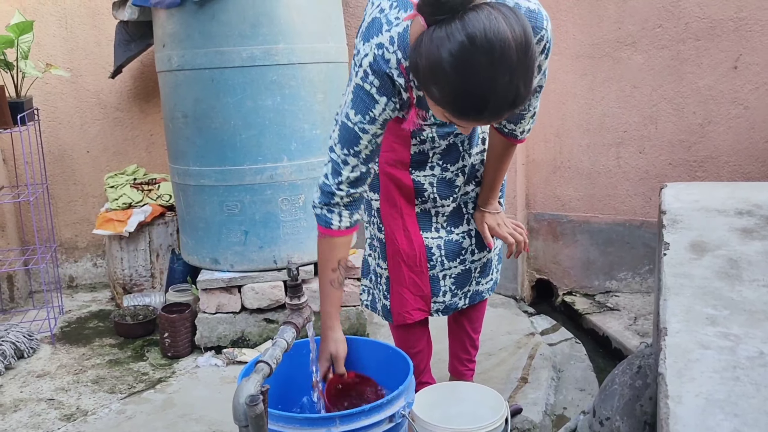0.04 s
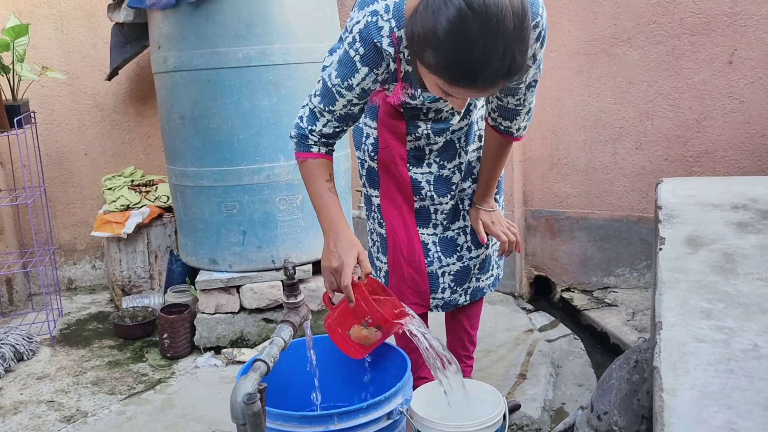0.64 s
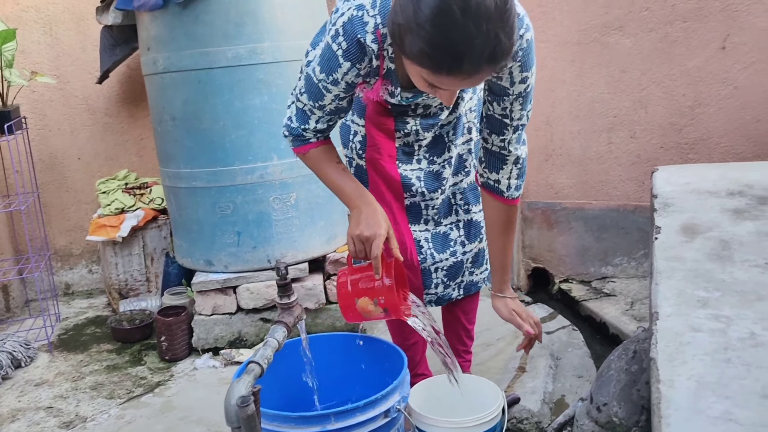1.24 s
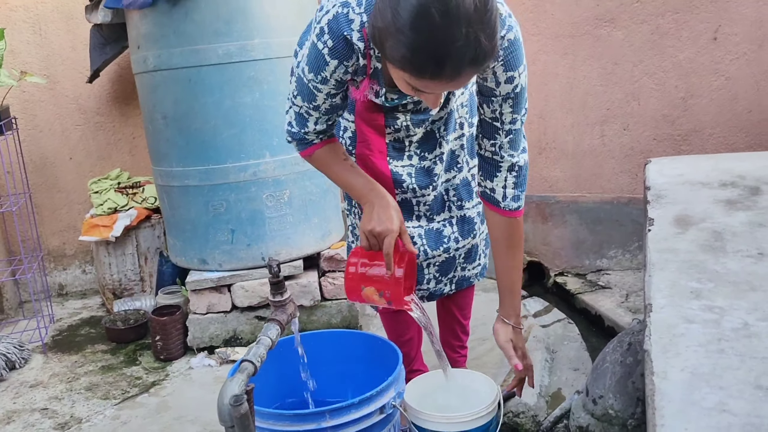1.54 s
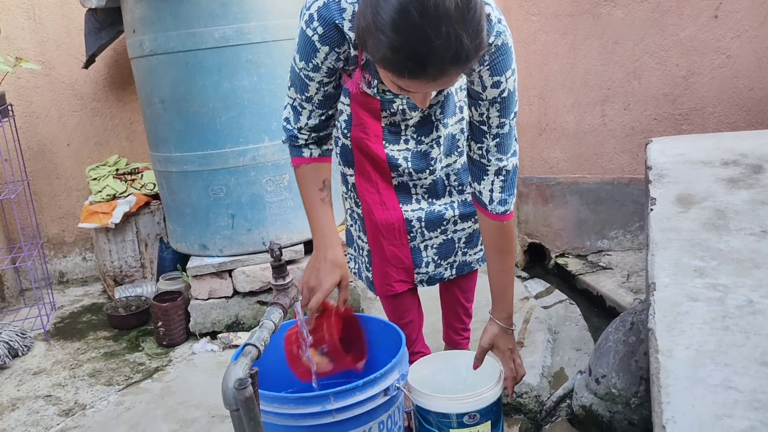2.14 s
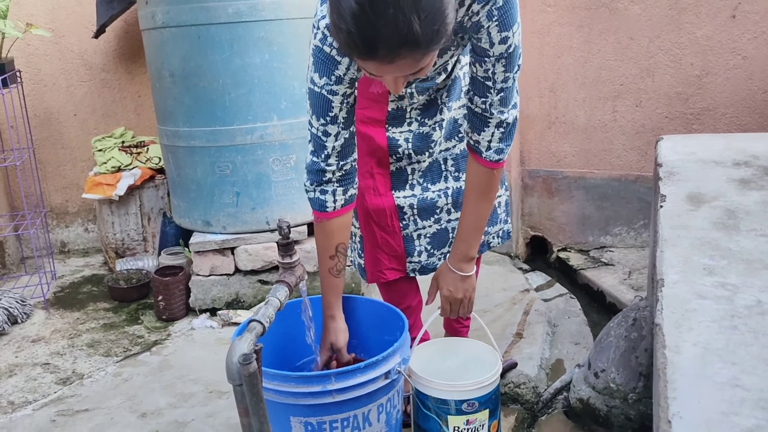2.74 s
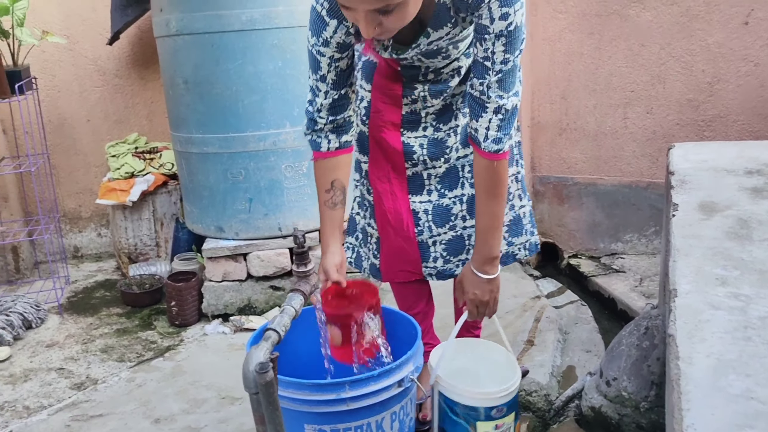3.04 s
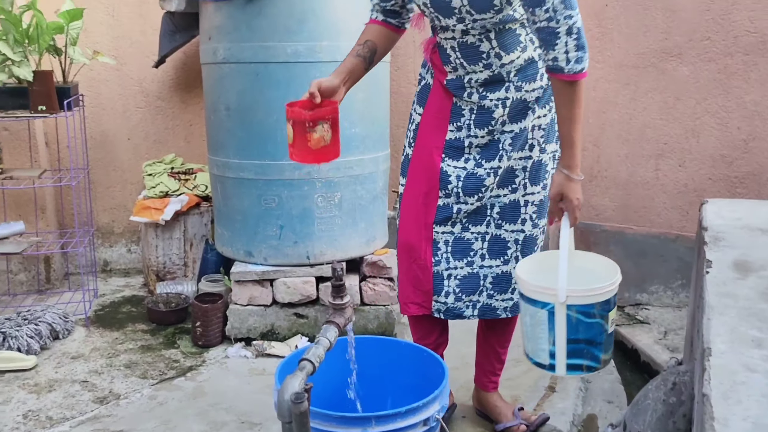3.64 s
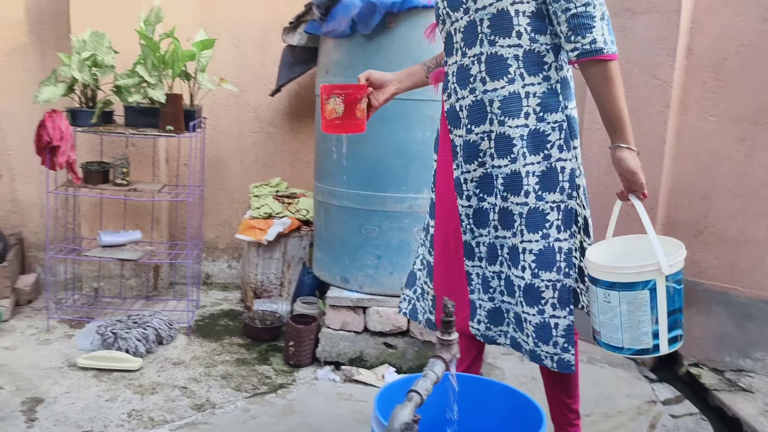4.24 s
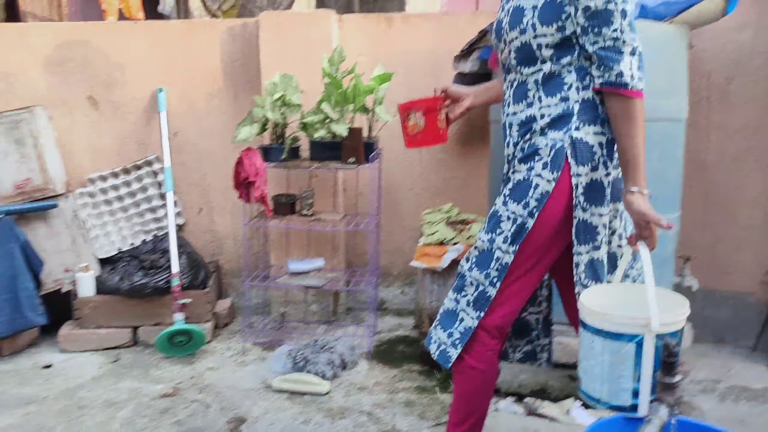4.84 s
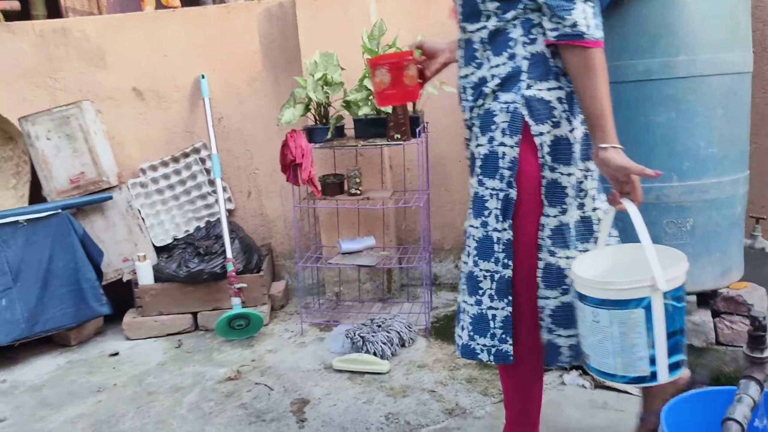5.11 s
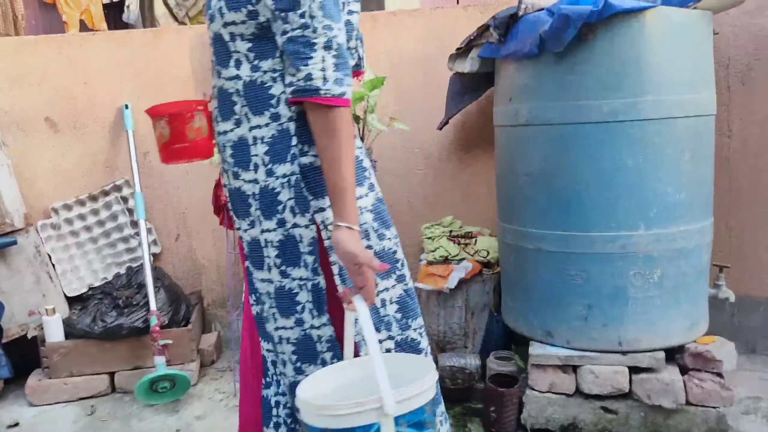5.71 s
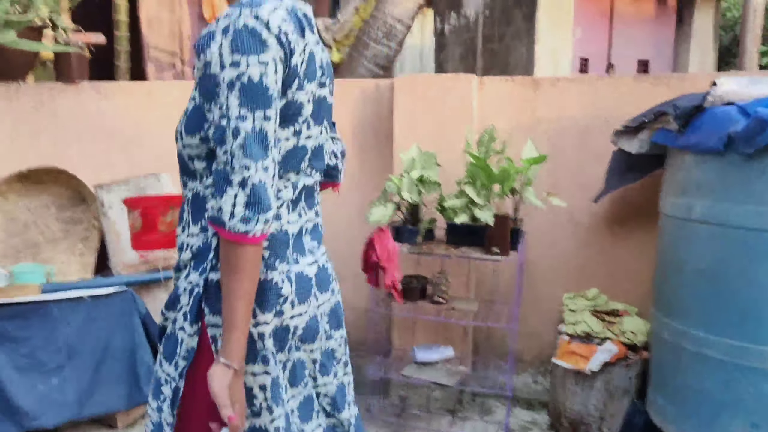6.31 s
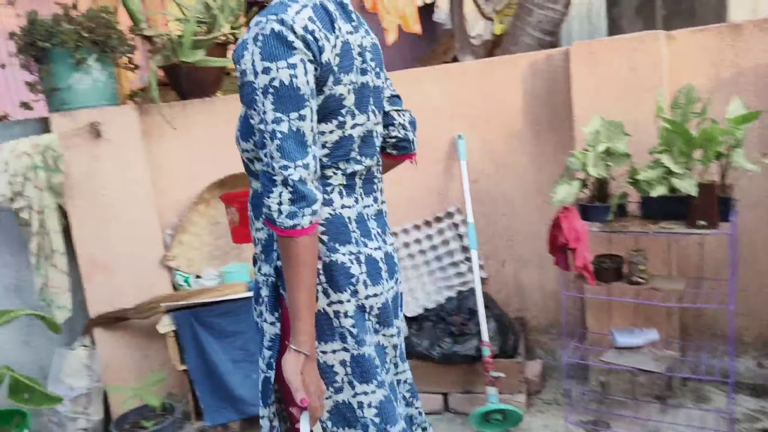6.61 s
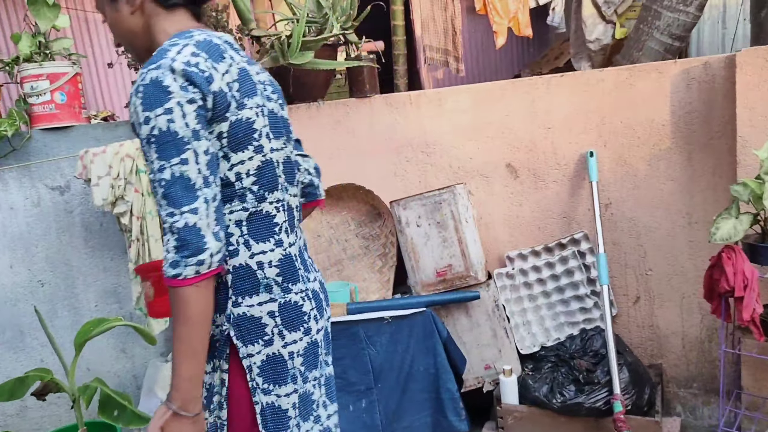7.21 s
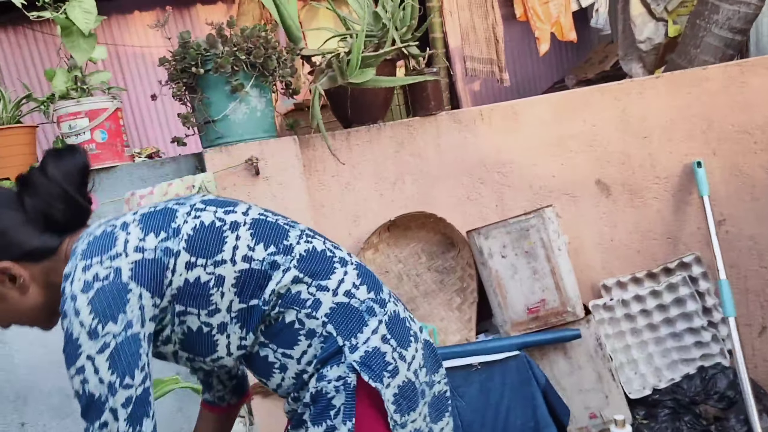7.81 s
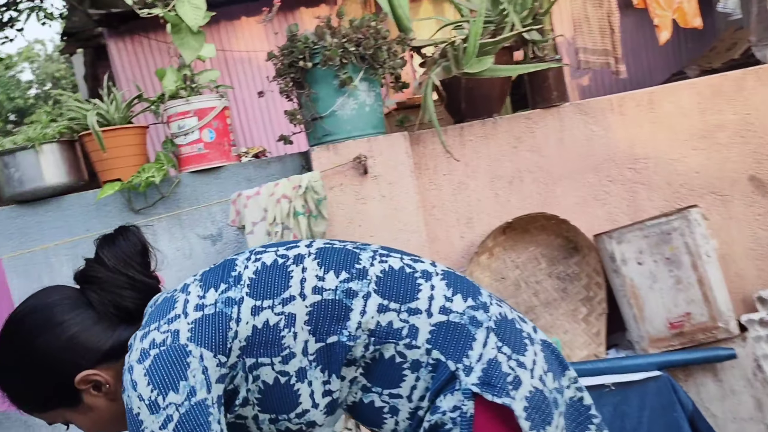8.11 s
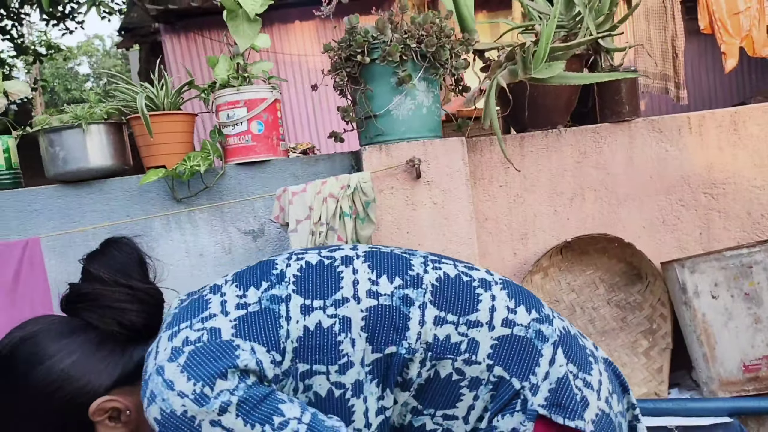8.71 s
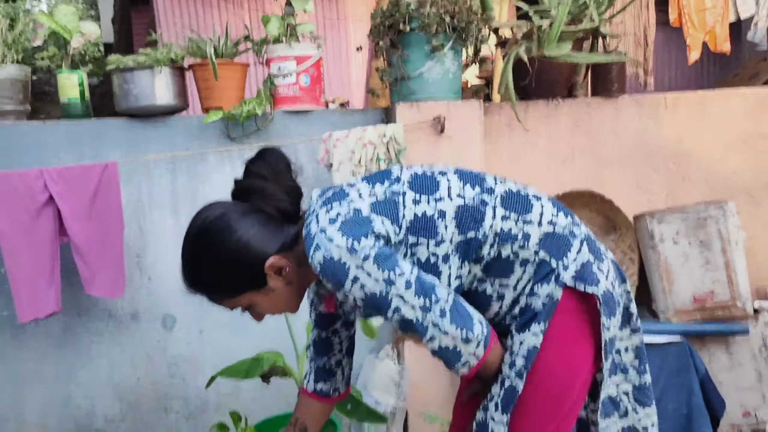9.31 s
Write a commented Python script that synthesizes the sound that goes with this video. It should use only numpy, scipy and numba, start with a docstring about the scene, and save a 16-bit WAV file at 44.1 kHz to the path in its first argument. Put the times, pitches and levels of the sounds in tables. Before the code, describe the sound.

In a walled yard, a tap runs into a half-full plastic bucket, spattering, fizzing and gurgling with deep plops. A mug scoops water and pours it into a pail with a bright burble, then clacks against the bucket and sloshes as it dips again. The microphone moves away, so the stream turns fainter, hollow and washy. Near the end a last mugful is tipped out in a brief patter of drops.

```python
"""A walled yard, where a tap runs into a half-full plastic bucket. The stream spatters, fizzes and
drives big bubbles under that gurgle in the bucket's hollow. A mug scoops water and pours it into a
pail; then the microphone moves away from the tap, which turns hollow and washy, and a last mugful
is tipped out. The water is mostly ringing bubbles and droplet clicks, echoed by the walls."""
import sys
import numpy as np
from scipy import signal
from scipy.fft import rfft, irfft
from scipy.io import wavfile
from scipy.ndimage import uniform_filter1d
from numba import njit

SR = 44100
rng = np.random.default_rng(int(sys.argv[2]) if len(sys.argv) > 2 else 0)


def dump(signal):
    """Clip the signal to [-1, 1] and save it as 16-bit WAV at the path in sys.argv[1]."""
    limited = np.clip(np.atleast_2d(signal).T, -1, 1)
    pcm = np.round(limited * 32767).astype(np.int16)
    wavfile.write(sys.argv[1], SR, pcm)


N = 416833
TIME = np.arange(N) / SR

# The steady stream, fainter as the microphone walks off.
# Each row: time in seconds, spatter level and fizz level in relative dB.
STREAM_LEVELS = [(0, -51, -60), (.4, -51, -56), (.9, -51, -54), (1.6, -50.5, -58), (2.15, -53, -56.5),
                 (3.1, -52, -59.5), (3.9, -53.5, -57), (4.5, -55.5, -58), (4.85, -53, -55.5),
                 (5.25, -55, -60.5), (5.65, -53, -61.5), (6.35, -55.5, -61.5), (6.65, -57, -56),
                 (7.2, -59, -60.5), (7.8, -56.5, -57.5), (8.2, -59, -61), (8.55, -61.5, -66.5),
                 (9.45, -60.5, -61.5)]
# Spells in which the stream drives air deep.
# Each row: start and length in seconds, level in relative dB, nominal bubble pitch in Hz.
GURGLE_SPELLS = [(0.134, 0.23, -58.5, 356), (0.394, 0.07, -51, 355), (0.505, 0.27, -51.5, 351),
                 (0.69, 0.26, -52, 359.5), (1.043, 0.37, -58, 346), (1.579, 0.2, -59.5, 360),
                 (1.82, 0.13, -53, 323), (1.966, 0.43, -55, 335), (2.244, 0.13, -43.5, 316.7),
                 (2.46, 0.084, -46.5, 381.3), (2.57, 0.16, -53, 362), (2.82, 0.27, -54.5, 309.5),
                 (3.16, 0.19, -47, 363.3), (3.367, 0.14, -53, 394), (3.606, 0.025, -52.5, 345.5),
                 (3.679, 0.33, -52, 331.6), (4.107, 0.082, -49.5, 321), (4.213, 0.39, -53, 366.7),
                 (4.858, 0.34, -54, 340), (5.328, 0.12, -64, 416), (5.47, 0.16, -52.5, 392.4),
                 (5.701, 0.033, -51.5, 282), (5.825, 0.28, -62.5, 384), (6.05, 0.257, -57.5, 355),
                 (6.414, 0.24, -61.5, 366), (6.878, 0.54, -55, 360.5), (7.482, 0.023, -49.5, 344),
                 (7.559, 0.16, -58.5, 339), (7.843, 0.016, -49.5, 368), (7.912, 0.076, -62.5, 332),
                 (8.268, 0.025, -58, 371), (8.49, 0.31, -61, 337.5), (8.799, 0.032, -56.5, 346.4),
                 (8.927, 0.14, -60, 353), (9.388, 0.096, -65.5, 363)]
# Low and high resonances of the air in the bucket. Each row: centre in Hz, width in Hz, gain in dB.
BUCKET_LOW_MODES = [(352.4, 37, -9), (508, 6.5, -22), (690, 11, -20), (870, 61, -15), (1015, 88, -20),
                    (1149, 10, -22), (1270, 65, -21.5), (1513, 420, -7.5)]
BUCKET_HIGH_MODES = [(2130, 280, -1.5), (2507, 270, -11.5), (2730, 800, -5.5), (3306, 750, -3.5),
                     (3640, 200, -5), (3920, 440, -10), (4610, 240, -3), (4910, 170, -7)]


def undb(db):
    """Decibels to gain."""
    return 10 ** (np.asarray(db) / 20)


def curve(table, column=1):
    """An automation line: one column of a table, joined by straight lines over time."""
    rows = np.array(table)
    return np.interp(TIME, rows[:, 0], rows[:, column])


def unit(x):
    """Scale to rms 1."""
    return x / np.sqrt(np.mean(x ** 2))


def even(x, span_s):
    """Hold a texture near rms 1 over spans longer than its grains."""
    size = max(int(span_s * SR), 2)
    power = uniform_filter1d(uniform_filter1d(x ** 2, size), size)
    return x / np.sqrt(np.abs(power) + 1e-18)


def colour(x, points, size=4096):
    """Causal EQ through (Hz, dB) points, built from the cepstrum."""
    hz, db = np.transpose(points)
    grid = np.maximum(np.arange(size // 2 + 1) * SR / size, 1)
    gain = undb(np.interp(np.log(grid), np.log(hz), db))
    cepstrum = irfft(np.log(gain))
    cepstrum[1:size // 2] *= 2
    cepstrum[size // 2 + 1:] = 0
    impulse = irfft(np.exp(rfft(cepstrum)))
    return signal.oaconvolve(x, impulse)[:len(x)]


def add(out, s, sound):
    """Mix a sound in at s seconds."""
    start = int(np.clip(s * SR, 0, N - 1))
    out[start:start + len(sound)] += sound[:N - start]


def swells(rows, attack_s, sag_db_per_s, release_s):
    """Envelope of (start s, length s, dB) events: each rises, sags (climbs if negative), then dies."""
    power = np.zeros(N)
    for s, length, db in rows:
        t = np.arange(int((abs(length) + 7 * release_s) * SR)) / SR
        shape = np.minimum(t / attack_s, 1) * np.exp(-np.maximum(t - length, 0) / release_s)
        add(power, s, (shape * undb(db - sag_db_per_s * t)) ** 2)
    return np.sqrt(power)


def burst(t60):
    """Noise that dies away by 60 dB in t60 seconds."""
    t = np.arange(int(max(t60, .002) * SR)) / SR
    return rng.standard_normal(len(t)) * undb(-60 * t / t[-1])


def echoes(x, t60):
    """Dense reflections with the same energy as the sound."""
    tail = burst(t60)
    return signal.oaconvolve(x, tail / np.linalg.norm(tail))[:N]


@njit
def bandpass(x, hz, width):
    """Resonance whose centre may move; gain 1 at the centre."""
    y, band, low = np.empty(len(x)), 0., 0.
    for i in range(len(x)):
        g, damping = np.tan(np.pi * hz[i] / SR), width / hz[i]
        v = (band + g * (x[i] + 1e-18 - low)) / (1 + g * (g + damping))
        band, low = 2 * v - band, low + 2 * g * v
        y[i] = damping * v
    return y


def resonate(x, modes, drift=.018, drifts_per_s=3):
    """Pass a sound through (Hz, width Hz, dB) resonances that drift as the water heaves."""
    knots = np.arange(0, TIME[-1] + 1, 1 / drifts_per_s)
    out = np.zeros(N)
    for hz, width, db in modes:
        detune = 1 + drift * np.interp(TIME, knots, rng.standard_normal(len(knots)))
        out += undb(db) * bandpass(x, hz * detune, float(width))
    return out


@njit
def ring(rows, glide, onset):
    """Bubbles (s, gain, Hz, cycles to -60 dB): each swells in `onset` cycles and bends up by `glide`."""
    out = np.zeros(N)
    for s, gain, hz, cycles in rows:
        start, length = max(int(s * SR), 0), cycles * SR / hz
        for i in range(min(int(length), N - start)):
            age = i / length
            turns = cycles * age * (1 + glide * age / 2)
            swell = 1 - np.exp(-(turns / onset) ** 2)
            out[start + i] += gain * swell * np.exp(-6.9 * age) * np.sin(2 * np.pi * turns)
    return out


def bubbles(count, hz, octaves, cycles, spread_db, glide, busy=1, onset=.9):
    """A swarm around hz, born at random, many faint and a few strong; `busy` is the share that forms."""
    when, pitch, rank, life, birth = rng.random((count, 5)).T
    at = (when * N).astype(int)
    gain = undb(-spread_db * np.log(np.maximum(rank, 1 / 300)))
    bubble_hz = np.broadcast_to(hz, N)[at] * 2 ** (octaves * (pitch - .5))
    rows = np.column_stack([at / SR, gain, bubble_hz, cycles * (.5 + life)])
    formed = birth < np.broadcast_to(busy, N)[at]
    return ring(rows[formed], float(glide), float(onset))


def impacts(count, spread_db):
    """Droplet clicks at random moments, of very unequal force."""
    when, rank, force = rng.random((count, 3)).T
    gain = (2 * force - 1) * undb(-spread_db * np.log(np.maximum(rank, 1 / 200)))
    return np.bincount((when * N).astype(int), gain, N)


def outdoor_air(level_db=-77):
    """A quiet bed of open air: low rumble and a soft hiss."""
    air_eq = [(20, 1.5), (60, 10.5), (200, -20.5), (600, -11), (1500, -0.5), (8000, -55)]  # Each row: frequency in Hz, gain in dB.
    return undb(level_db) * unit(colour(rng.standard_normal(N), air_eq))


def reflections(x, t60, spots):
    """Echo patterns crossfade from spot to spot as the microphone is carried about."""
    place = TIME / TIME[-1] * (spots - 1)
    fades = (np.sqrt(np.maximum(1 - np.abs(place - k), 0)) for k in range(spots))
    return sum(echoes(x * fade, t60) for fade in fades)


def wall_echo(x):
    """The plastered walls send back a darker echo, strongest as the microphone leaves the tap."""
    echo_send = [(0, -6), (5.5, -10.5), (6.8, -2), (9.4, -16)]  # Each row: time in seconds, send level in dB.
    wall_eq = [(200, 3.5), (3000, -1), (6500, -10)]  # Each row: frequency in Hz, gain in dB.
    return undb(curve(echo_send)) * colour(reflections(x, t60=.5, spots=6), wall_eq)


def scatter(x):
    """Early reflections off bucket and yard blur bubbles into a soft wash, more so from afar."""
    wet_mix = [(3, 0), (5.2, .25), (6.2, .65), (9.4, .7)]  # Each row: time in seconds, scattered share from 0 to 1.
    wet = curve(wet_mix)
    return np.sqrt(1 - wet) * x + np.sqrt(wet) * reflections(x, t60=.06, spots=9)


def across_yard(x):
    """The tap turns hollow as the microphone walks away, with gaps between the bucket's resonances."""
    far_mix = [(5.2, 0), (6.4, .45), (7.2, .5), (7.6, 1)]  # Each row: time in seconds, distant share from 0 to 1.
    far_eq = [(150, -9.5), (350, 2), (1250, 6.5), (1700, -2.5), (2080, -1.5), (2330, -3), (2600, -1.5),
              (3300, -1), (3700, -2), (4000, -4.5), (4400, -3), (4800, -3.5), (5400, 1), (6200, -3.5)]  # Each row: frequency in Hz, gain in dB.
    far = curve(far_mix)
    return (1 - far) * x + far * colour(x, far_eq)


def thumps(rumble_db=-77):
    """Dull thumps, like heaving water or a footfall, over the water's faint low stir."""
    cues = [(.55, 0.39, -60), (1.1, 0.13, -61), (2.24, 0.073, -53.5), (2.44, 0.036, -59),
            (2.73, 0.018, -61.5), (3.05, 0.39, -64), (3.76, 0.25, -63), (4.87, 0.096, -62),
            (5.83, 0.04, -69.5), (6.33, 0.03, -59.5), (6.49, 0.029, -64.5), (7.26, 0.042, -60.5),
            (7.93, 0.025, -57), (9.07, 0.096, -74)]  # Each row: start in seconds, length in seconds, level in dB.
    heave_eq = [(15, -26), (45, -12), (90, -2.5), (140, 0), (200, 1.5), (300, -7), (450, -18), (1200, -42)]  # Each row: frequency in Hz, gain in dB.
    envelope = swells(cues, attack_s=.0027, sag_db_per_s=8, release_s=.045)
    return unit(colour(rng.standard_normal(N), heave_eq)) * np.hypot(envelope, undb(rumble_db))


def handle_squeak(start_s=4.03, length_s=.22, hz=1420, peak_db=-68):
    """The pail's handle swings with a thin tone that swells and fades."""
    arch = np.sin(np.pi * np.clip((TIME - start_s) / length_s, 0, 1))
    return undb(peak_db) * arch * np.sin(2 * np.pi * hz * TIME)


def mug_knocks():
    """The plastic mug clacks against the bucket as it dips."""
    hits = [(2.238, -33.5, 0.02), (2.508, -31, 0.026), (2.512, -26, 0.03)]  # Each row: start in seconds, level in relative dB, 60 dB decay in seconds.
    mug_modes = [(1850, 300, -24), (2320, 370, -2.5), (3050, 610, 4), (4150, 110, 4), (5050, 560, 0)]  # Each row: centre in Hz, width in Hz, gain in dB.
    out = np.zeros(N)
    for s, db, t60 in hits:
        add(out, s, undb(db) * burst(t60))
    return resonate(out, mug_modes)


def slaps(trim_db=-9):
    """A mass of water lands or slops at once: a dull splash."""
    hits = [(0.724, -32, 0.078), (0.734, -32, 0.053), (0.804, -31.5, 0.028), (2.239, -29.5, 0.047),
            (2.506, -48, 0.041), (3.215, -51, 0.91), (4.857, -44, 0.12)]  # Each row: start in seconds, level in relative dB, 60 dB decay in seconds.
    slap_eq = [(50, -68), (150, 0.5), (320, 7.5), (600, 6), (950, 12.5), (1300, 4), (1700, -7),
               (3000, -11.5), (7000, -15.5)]  # Each row: frequency in Hz, gain in dB.
    out = np.zeros(N)
    for s, db, t60 in hits:
        add(out, s, undb(db + trim_db) * burst(t60))
    return 4 * colour(out, slap_eq)


def rim_rush():
    """Water sliding over the mug's rim breaks into a dense, smooth rush of tiny bubbles."""
    cues = [(.66, 0.32, -56), (1.0, 0.44, -56), (2.25, 0.12, -49.5), (2.6, 0.19, -47)]  # Each row: start in seconds, length in seconds, level in dB.
    sheet_eq = [(900, -15), (1700, -12), (2600, -1.5), (3400, 3), (4500, -2.5), (5500, 2), (6500, 13.5),
                (7500, 9.5), (8200, -26)]  # Each row: frequency in Hz, gain in dB.
    swarm = bubbles(count=90000, hz=3800, octaves=2.3, cycles=12, spread_db=1.5, glide=.04)
    return unit(colour(swarm, sheet_eq)) * swells(cues, attack_s=.029, sag_db_per_s=0, release_s=.035)


def patter():
    """The last mugful lands as a bright shower of drops."""
    cues = [(8.17, .2, -59)]  # Each row: start in seconds, length in seconds, level in dB.
    shower_modes = [(2100, 250, 0), (3300, 400, -2), (4150, 260, 2), (4720, 240, 5)]  # Each row: centre in Hz, width in Hz, gain in dB.
    shower = bubbles(count=9000, hz=3300, octaves=1.4, cycles=16, spread_db=3, glide=.03)
    steady = even(resonate(shower, shower_modes), span_s=.05)
    return steady * swells(cues, attack_s=.018, sag_db_per_s=37, release_s=.13)


def pour(flow):
    """The mug's thin sheet of water burbles brightly in the pail."""
    pail_eq = [(400, -22), (660, -27), (780, -16.5), (880, 3.5), (1150, 2.5), (1400, 1), (1750, -8),
               (3000, -46.5)]  # Each row: frequency in Hz, gain in dB.
    swarm = bubbles(count=4500, hz=1200, octaves=1.4, cycles=28, spread_db=3.2, glide=.08)
    return even(colour(swarm, pail_eq), span_s=.055) * flow * undb(-2)


def slosh(stir):
    """Stirred water folds in mid-sized bubbles that ring the bucket; hard splashes add droplets."""
    # Tone of the bubbles and of the droplet rush. Each row: frequency in Hz, gain in dB.
    slosh_eq = [(150, -36.5), (450, 13), (620, -10), (730, -5), (880, -1.5), (1150, -1.5), (1400, -2),
                (1700, -14), (3000, -54)]
    rush_eq = [(300, -20), (700, -16.5), (900, 4.5), (1300, -5), (1700, -3.5), (2300, -14.5), (4000, -20),
               (8000, -31.5)]
    busy = np.clip(stir * undb(50), .35, 1)
    swarm = bubbles(count=3200, hz=870, octaves=1.3, cycles=42, spread_db=2.6, glide=.06,
                    busy=busy, onset=1.4)
    body = resonate(swarm, BUCKET_LOW_MODES[2:]) + undb(-21) * np.sqrt(busy) * swarm
    rush = undb(-8.5) * unit(colour(impacts(count=25000, spread_db=3), rush_eq))
    splashing = even(colour(body, slosh_eq), span_s=.031) + busy ** 3 * rush
    return splashing * stir * undb(-2.5)


def slugs(per_s, spread_db):
    """A gain that jumps at random as the stream breaks into slugs."""
    step = int(SR / per_s)
    held = np.repeat(rng.standard_normal(N // step + 1), step)[:N]
    return uniform_filter1d(undb(spread_db * held), step // 2)


def stream_gain(column):
    """Fader for the spatter (column 1) or the fizz (column 2): the steady stream plus spurts of spray."""
    # Each row: start and length in seconds, spatter level and fizz level in relative dB.
    spurts = [(0.659, 0.2, -46.5, -69), (2.53, 0.13, -50, -70), (3.059, 0.02, -44.5, -63),
              (3.22, 0.025, -43.5, -53.5), (3.326, 0.019, -41.5, -69), (3.378, 0.015, -40, -43.5),
              (3.722, 0.04, -50, -55), (3.788, 0.045, -51.5, -59), (4.006, 0.066, -52.5, -63),
              (4.14, 0.17, -52, -72), (4.36, 0.011, -37.5, -40), (5.535, 0.019, -52, -56),
              (5.94, 0.2, -66, -56.5), (7.09, 0.21, -53, -57.5), (7.45, 0.093, -52.5, -82),
              (7.913, 0.093, -57, -83), (8.188, 0.03, -89, -61), (8.918, 0.025, -83, -62)]
    cues = [(row[0], row[1], row[1 + column]) for row in spurts]
    spurting = swells(cues, attack_s=.015, sag_db_per_s=13.5, release_s=.0017)
    return np.hypot(undb(curve(STREAM_LEVELS, column)), spurting)


def trickle(trim_db=-18.5):
    """Mid-sized bubbles at the stream's edge ring the bucket softly, following the steady spatter."""
    trickle_eq = [(400, -13.5), (560, -6), (720, -6), (920, -10), (1150, -9), (1350, -7), (1650, -12),
                  (2000, -17)]  # Each row: frequency in Hz, gain in dB.
    swarm = bubbles(count=4500, hz=1000, octaves=2, cycles=30, spread_db=2.2, glide=.05, onset=1.8)
    body = resonate(swarm, BUCKET_LOW_MODES[2:]) + undb(-27) * swarm
    return even(colour(body, trickle_eq), span_s=.12) * undb(curve(STREAM_LEVELS) + trim_db)


def single_bubbles(plop_db=3, plink_db=2.5, plink_cycles=28):
    """Big plops and small plinks stand out of the swarm; each plink also rings the bucket."""
    # Each row: start in seconds, level in relative dB, pitch in Hz and, for plops, ring in cycles.
    plops = [(0.018, -29, 288, 9.3), (0.093, -42, 668, 19), (0.108, -33, 747, 12.5),
             (0.173, -37.5, 372, 12.6), (0.206, -46.5, 1212, 80), (0.256, -36, 934, 30),
             (0.322, -40.5, 934, 47), (0.575, -39.5, 342, 51), (0.725, -28.5, 336.5, 30),
             (1.105, -42.5, 860, 54), (1.161, -37.5, 309, 73), (1.232, -36.5, 365.5, 34),
             (1.692, -42.5, 344, 30), (1.874, -24.5, 326, 9.2), (2.022, -33, 344, 20),
             (2.146, -31.5, 355, 20), (2.238, -30.5, 275.5, 39), (2.467, -30.5, 493, 15),
             (2.477, -19.5, 384, 11), (2.515, -36, 470, 23), (2.562, -44, 763, 51), (2.583, -32.5, 815, 62),
             (2.86, -39, 853, 28), (2.89, -41, 1240, 36), (3.019, -46, 780, 51), (3.19, -30.5, 323, 39),
             (3.212, -31, 944, 30), (3.239, -33, 340, 21), (3.243, -38, 858, 69), (3.45, -44, 446, 30),
             (4.137, -34, 272, 21), (4.14, -45, 810, 25), (4.245, -52.5, 866, 70), (4.357, -33.5, 358, 23),
             (4.495, -23.5, 377, 12.5), (4.859, -33.5, 917, 41), (4.86, -42, 756, 16),
             (5.006, -43, 333, 13), (5.075, -47, 586, 66), (5.42, -53.5, 850, 70), (5.543, -36, 401, 34),
             (5.604, -21.5, 319, 6.9), (6.198, -38.5, 357, 31), (6.2, -51, 824, 35), (6.446, -42, 356, 74),
             (6.542, -36.5, 376, 40), (6.894, -22, 305, 11.2), (7.114, -42, 411, 38),
             (7.265, -52.5, 505, 75), (7.275, -39, 351, 30), (7.572, -33.5, 337, 15),
             (7.843, -38.5, 392, 10.7), (7.948, -29, 295, 11.3), (7.956, -45, 840, 25),
             (7.989, -42, 912, 51), (8.021, -50, 858, 48), (8.14, -66, 774, 45), (8.828, -45.5, 337, 35)]
    plinks = [(2.0354, -37.5, 1980), (3.8701, -38, 2060), (3.9428, -31, 3260), (4.5278, -40.5, 2790),
              (4.752, -35.5, 2390), (4.778, -36.5, 3780), (5.544, -44.5, 2670), (5.917, -44.5, 2640),
              (6.0992, -46, 2630), (6.6399, -45.5, 3480), (6.715, -45, 2680), (6.795, -43, 2360),
              (6.812, -45.5, 3010), (6.968, -46, 2830), (7.1303, -43, 2600), (7.4973, -38, 3050),
              (7.5379, -37, 2900), (7.5743, -39, 2700), (7.7389, -38, 3010), (7.8128, -43, 3320),
              (7.8666, -42, 3570), (7.9075, -39.5, 3260), (7.9244, -40, 2030), (8.0869, -45, 3180),
              (8.1794, -44, 3040), (8.198, -37.5, 2940), (8.2739, -42, 2130), (8.522, -46.5, 3180),
              (8.6052, -49.5, 3230), (8.738, -49.5, 2990), (8.7713, -47, 3080), (8.9549, -50, 2580),
              (9.012, -49.5, 3220), (9.04, -53, 2070), (9.115, -41.5, 3700), (9.15, -50, 2640),
              (9.2452, -46, 3660), (9.355, -51, 2710), (9.3799, -51, 2540)]
    big_rows = [(s, undb(db + plop_db), hz, max(cycles, 2)) for s, db, hz, cycles in plops]
    small_rows = [(s, undb(db + plink_db), hz, plink_cycles) for s, db, hz in plinks]
    big = ring(np.array(big_rows, float), glide=.12, onset=1.7)
    small = ring(np.array(small_rows, float), glide=.1, onset=2.2)
    body = undb(1) * resonate(echoes(small, t60=.035), BUCKET_HIGH_MODES)
    return big + small + body


def hard_drops(cycles=12, boost_db=17.8):
    """Hard drops snap on the surface; the bucket wall scatters each a little."""
    hits = [(0.5154, -24, 6560), (.8039, -31, 6700), (0.913, -26.5, 6400), (0.968, -23, 6650),
            (1.123, -23.5, 7000), (1.466, -30.5, 6700), (1.643, -20, 6750), (1.9292, -21, 6760),
            (2.0589, -24, 6750), (2.2371, -22.5, 6730), (2.5119, -25.5, 6950), (3.17, -30.5, 6660),
            (3.32, -31, 7060), (3.3385, -26.5, 6760), (3.3846, -29.5, 6450), (3.4499, -27, 6530),
            (3.5352, -26.5, 6770), (3.6343, -27, 6640), (3.749, -32, 6700), (3.7602, -31, 6500),
            (3.8016, -30, 6500), (4.1648, -29, 6500), (4.267, -31, 6500), (4.2958, -30, 6560),
            (4.4291, -25.5, 6540), (4.496, -32, 6860), (4.5206, -19, 6800), (4.5472, -26.5, 6600),
            (4.7272, -21, 6700), (4.806, -28, 6260), (4.9019, -22, 6330), (4.9441, -26, 6250),
            (4.9626, -26.5, 6500), (5.0103, -25, 6800), (5.0253, -29, 6300), (5.069, -31.5, 5900),
            (5.139, -29, 6430), (5.329, -34, 6600), (5.3528, -26, 6600), (5.493, -27, 6300),
            (5.625, -20.5, 6670), (5.6369, -23, 6400), (5.6768, -27, 6650), (5.7078, -29.5, 6460),
            (5.8164, -27, 6100)]  # Each row: start in seconds, level in relative dB, pitch in Hz.
    rows = [(s + .0008, undb(db + boost_db), hz, cycles) for s, db, hz in hits]
    snap = ring(np.array(rows, float), glide=0., onset=3.)
    return snap + undb(-9) * echoes(snap, t60=.018)


def fizz(stir):
    """Millimetre bubbles ring the bucket; the wandering stream feeds each resonance in fits."""
    fizz_eq = [(1000, -48), (1700, 2.5), (2000, -9.5), (2300, -8), (2700, -5), (3300, -8.5), (4300, -4),
               (5500, -1), (8000, -53)]  # Each row: frequency in Hz, gain in dB.
    busy = np.clip(stir * undb(54), .5, 1)
    swarm = bubbles(count=28000, hz=3200, octaves=1.4, cycles=23, spread_db=2.5, glide=.03, busy=busy)
    body = sum(resonate(swarm * slugs(per_s=40, spread_db=3) ** (1.3 - busy), [mode])
               for mode in BUCKET_HIGH_MODES)
    direct = undb(-7) * busy ** 2 * swarm
    steady = even(colour(body + direct, fizz_eq), span_s=.05)
    flutter = slugs(per_s=42, spread_db=4.6) ** (1.2 - busy)
    return steady * flutter * stream_gain(column=2) * undb(-1.56)


def spatter():
    """The stream hits the surface: lone droplets ring for a few milliseconds over a finer spray."""
    spray_mix = [(0, .16), (.8, .4), (1.6, .25), (2.1, .35), (2.35, .8), (2.9, .8), (3.3, .25), (4.6, .17),
                 (5.7, .14), (6.5, .55), (8.2, .75), (9.4, .4)]  # Each row: time in seconds, share of fine spray from 0 to 1.
    # Tone of the lone droplets and of the spray. Each row: frequency in Hz, gain in dB.
    droplet_eq = [(1500, -53), (4400, -1.5), (5500, -6.5), (6500, 7.5), (7500, 2.5), (8200, -19)]
    spray_eq = [(1500, -58.5), (2100, -22.5), (3200, -8), (4400, -13), (5400, -11.5), (6100, -4.5),
                (6700, -2.5), (7500, -4), (8200, -16)]
    droplets = bubbles(count=12000, hz=6600, octaves=.5, cycles=18, spread_db=4, glide=.05, onset=1.3)
    lone = even(colour(droplets, droplet_eq), span_s=.06)
    fine = even(colour(impacts(count=60000, spread_db=3.3), spray_eq), span_s=.035)
    share = curve(spray_mix)
    blend = np.sqrt(1 - share) * lone + np.sqrt(share) * fine
    flutter = slugs(per_s=40, spread_db=3.2) ** (1 - .6 * share)
    return blend * flutter * stream_gain(column=1) * undb(1)


def gurgle(depth, floor_db=-77):
    """Large bubbles boom through the bucket's air column, with a faint burble between spells."""
    gurgle_eq = [(60, -39.5), (190, 14), (270, 7), (450, -1), (620, 10.5), (900, 2.5), (1400, -11.5),
                 (1700, -32), (2500, -39)]  # Each row: frequency in Hz, gain in dB.
    pitch = 1.04 * curve([(s + length / 2, hz) for s, length, _, hz in GURGLE_SPELLS])
    swarm = bubbles(count=900, hz=pitch, octaves=.75, cycles=42, spread_db=1.8, glide=.07, onset=1.8)
    body = resonate(swarm, BUCKET_LOW_MODES) + undb(-9) * swarm
    steady = even(colour(body, gurgle_eq), span_s=.03)
    return steady * (depth * undb(.5) + undb(floor_db))


def scene():
    """The mono mix: tap and mug, their echo from the yard walls and the quiet outdoor air."""
    # Splashes as the mug dips, lifts or spills or the water laps, and the pour into the pail.
    # Each row: start in seconds, length in seconds, level in relative dB.
    splash_cues = [(0, 1, -57), (.08, 0.44, -53.5), (.665, 0.075, -45), (.82, .15, -48), (.722, 0.015, -54),
                   (1.91, 0.23, -52.5), (2.24, 0.16, -51), (2.47, 0.45, -50.5), (2.575, 0.018, -41),
                   (2.99, 0.047, -56), (3.2, 0.043, -50), (3.3, 0.029, -56.5), (3.4, 0.14, -68.5),
                   (4.78, 0.0037, -50.5), (4.865, 0.039, -54.5), (4.93, 0.12, -58), (5.33, 0.29, -67),
                   (5.67, 0.064, -62.5), (5.97, 0.14, -63.5), (7.912, 0.11, -53.5), (8.04, 0.12, -67.5),
                   (9.0, 0.028, -63), (9.2, 0.073, -66.5)]
    pour_cues = [(.95, 0.7, -52.5)]
    gurgle_cues = [row[:3] for row in GURGLE_SPELLS]
    depth = swells(gurgle_cues, attack_s=.0099, sag_db_per_s=-7.5, release_s=.011)
    splashes = swells(splash_cues, attack_s=.0062, sag_db_per_s=4.5, release_s=.053)
    flow = swells(pour_cues, attack_s=.082, sag_db_per_s=-.5, release_s=.19)
    stir = np.hypot(splashes, depth * undb(-17.5))  # each gurgle also stirs the water a little
    tap = spatter() + scatter(fizz(stir + flow) + trickle())
    tap += gurgle(depth) + hard_drops() + single_bubbles()
    direct = across_yard(tap) + scatter(slosh(stir)) + thumps()
    direct += pour(flow) + rim_rush() + patter() + slaps() + mug_knocks() + handle_squeak()
    return (direct + wall_echo(direct) + outdoor_air())[None]


def suppress(x, depth_db=-18, size=1024):
    """The phone's noise suppressor turns each band down while its own level is faint."""
    thresholds = [(60, -97), (400, -84), (900, -83), (1700, -81), (3000, -83), (4500, -81.5), (7000, -86)]  # Each row: frequency in Hz, threshold in dB per bin.
    hz, _, bins = signal.stft(x, SR, nperseg=size)
    power = uniform_filter1d(np.abs(bins) ** 2, size=3, axis=-1)  # smooth over time
    power = uniform_filter1d(power, size=3, axis=-2)  # and across bands
    knee_hz, knee_db = np.transpose(thresholds)
    knee = undb(np.interp(hz, knee_hz, knee_db))[:, None] ** 2
    margin = np.abs(power / knee) ** 1.2
    gain = np.maximum(margin / (margin + 1), undb(depth_db))
    return signal.istft(bins * gain, SR, nperseg=size)[1][..., :N]


def record(dry, top_hz=7900):
    """The phone hushes faint bands and cuts the top end steeply; the level dips briefly once."""
    dip = np.interp(TIME, [8.452, 8.457, 8.466, 8.471], [1, .03, .03, 1])
    high_cut = signal.cheby1(14, .2, top_hz, fs=SR, output="sos")
    return signal.sosfilt(high_cut, suppress(dry) * dip)


dry = scene()
out = record(dry)
dump(out)
```